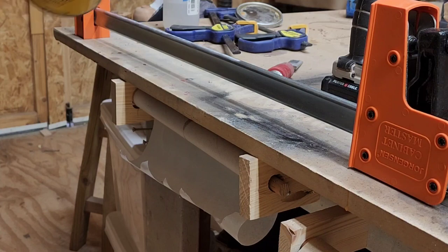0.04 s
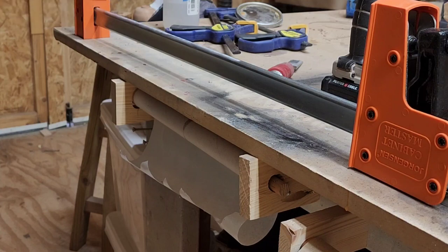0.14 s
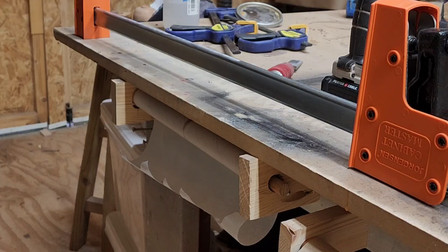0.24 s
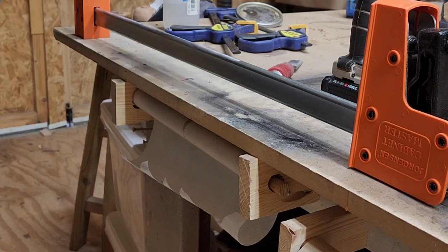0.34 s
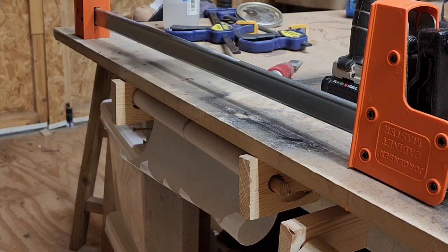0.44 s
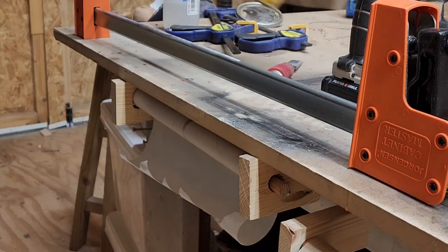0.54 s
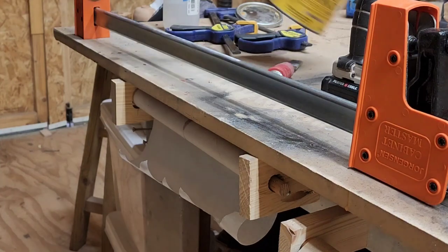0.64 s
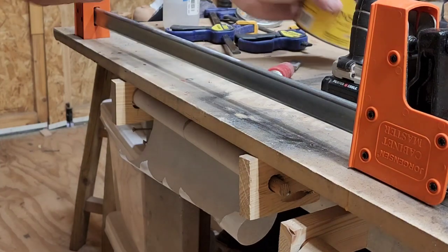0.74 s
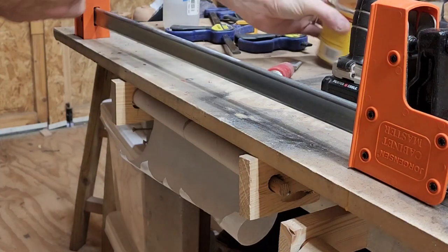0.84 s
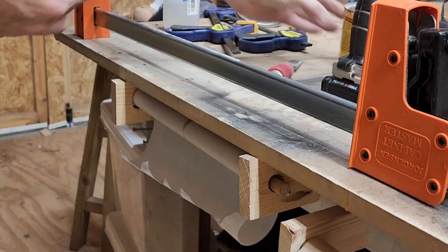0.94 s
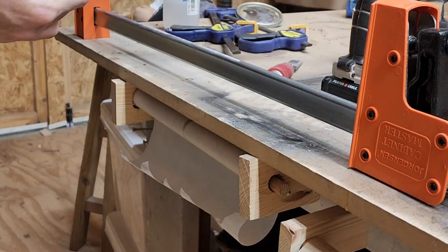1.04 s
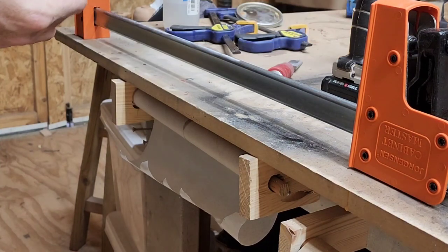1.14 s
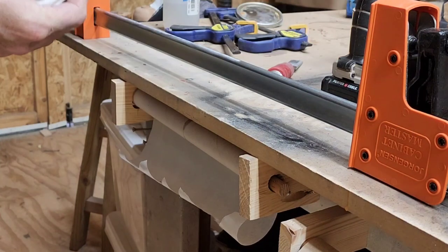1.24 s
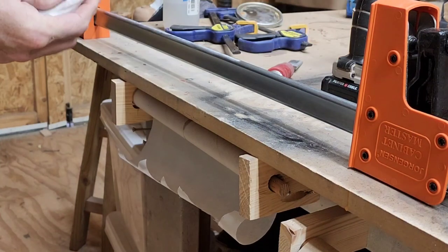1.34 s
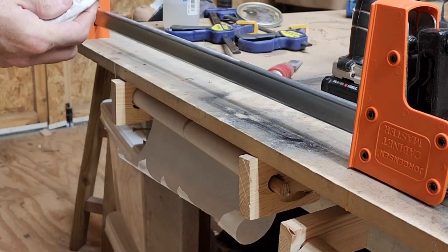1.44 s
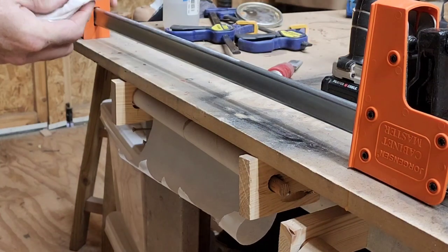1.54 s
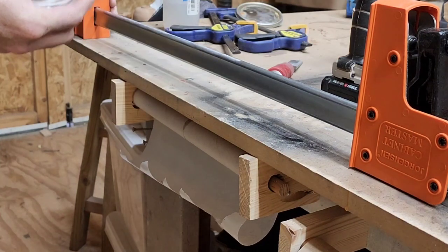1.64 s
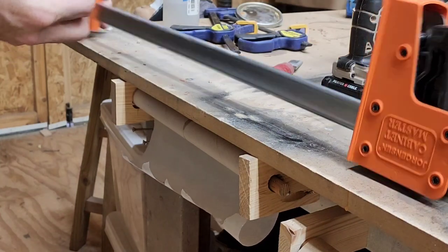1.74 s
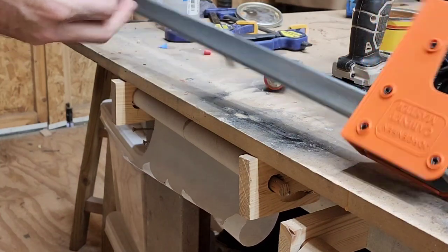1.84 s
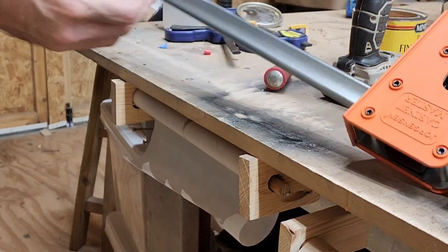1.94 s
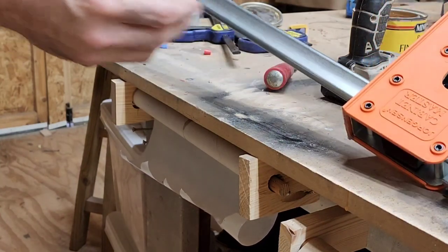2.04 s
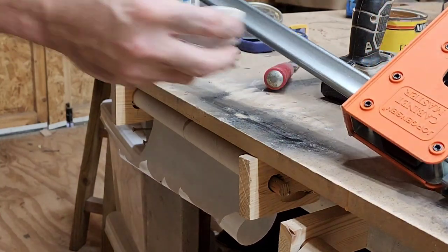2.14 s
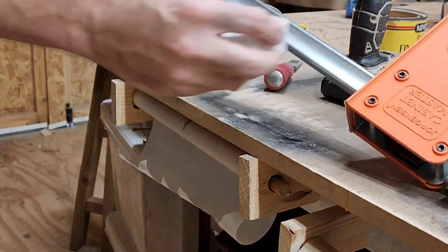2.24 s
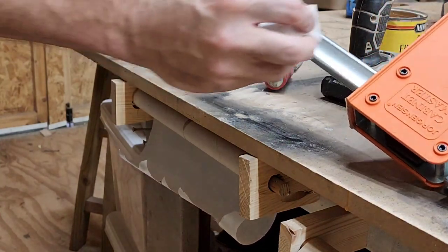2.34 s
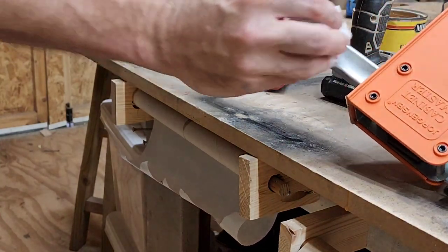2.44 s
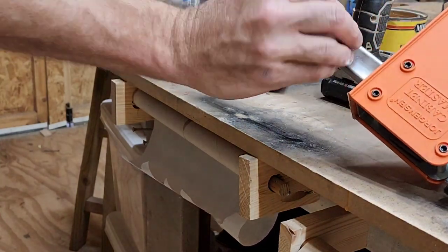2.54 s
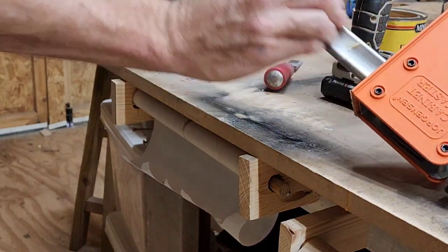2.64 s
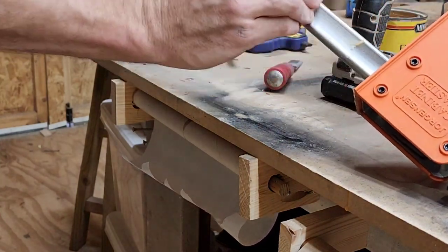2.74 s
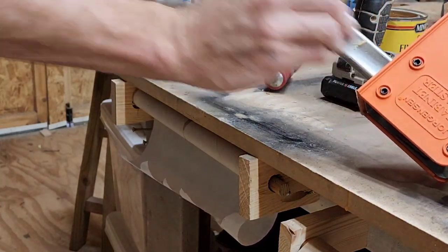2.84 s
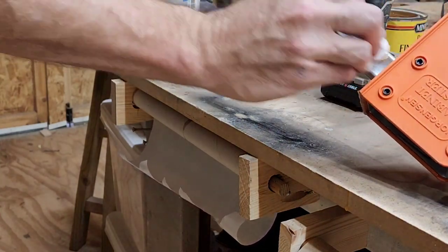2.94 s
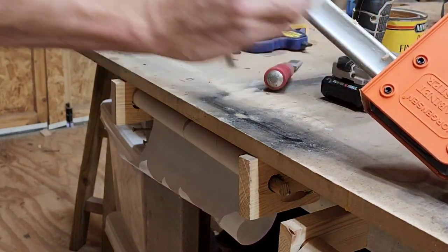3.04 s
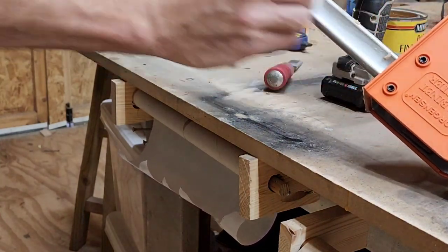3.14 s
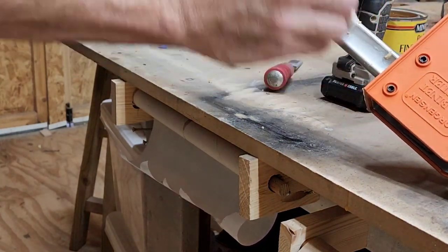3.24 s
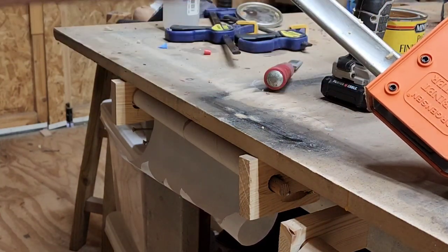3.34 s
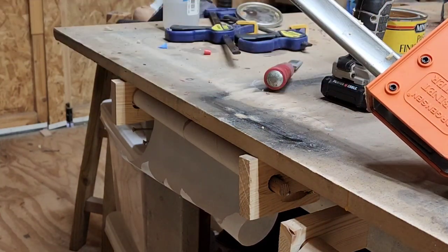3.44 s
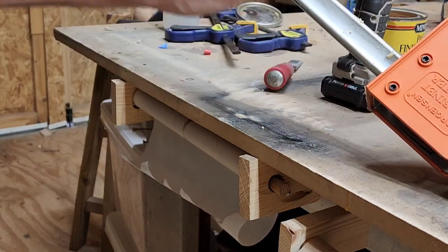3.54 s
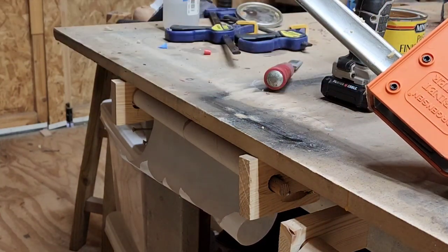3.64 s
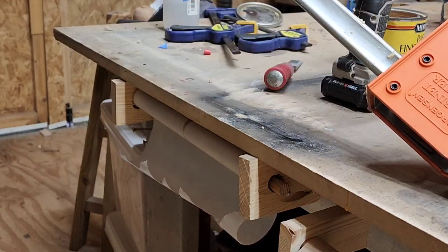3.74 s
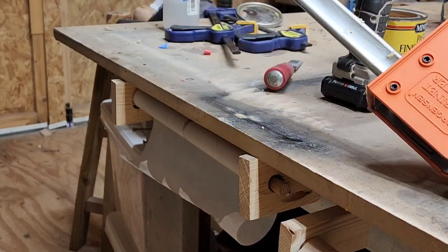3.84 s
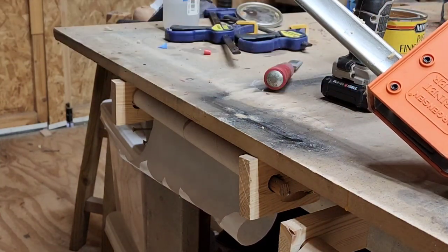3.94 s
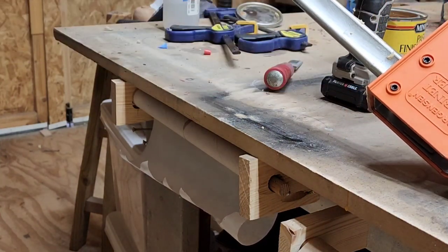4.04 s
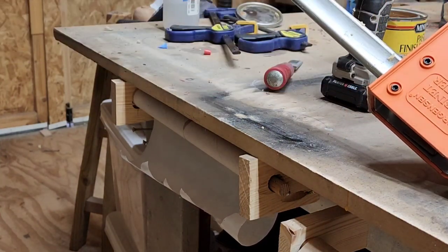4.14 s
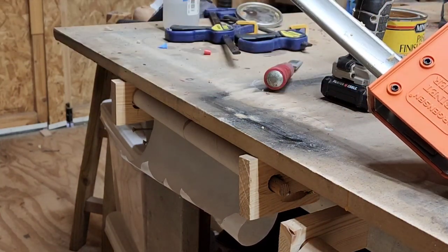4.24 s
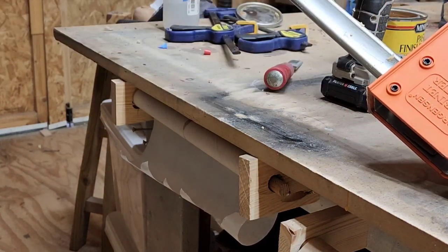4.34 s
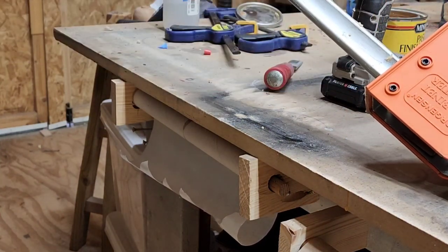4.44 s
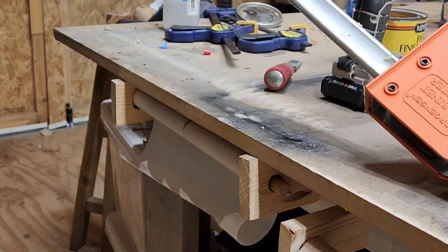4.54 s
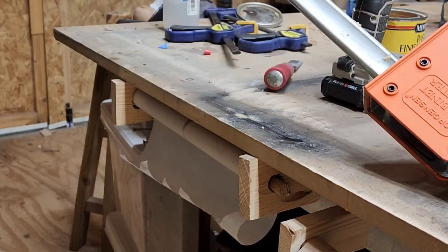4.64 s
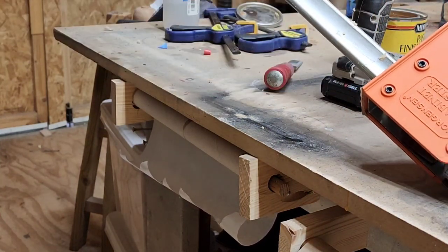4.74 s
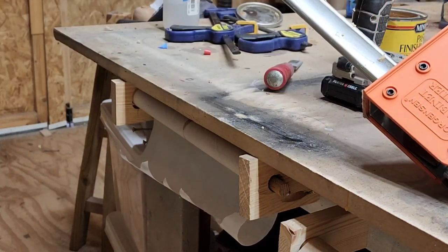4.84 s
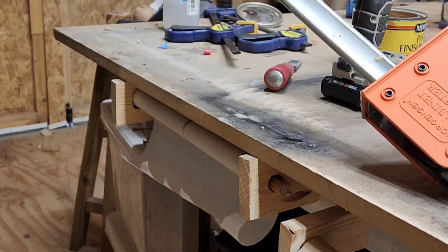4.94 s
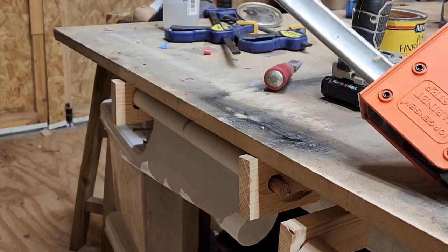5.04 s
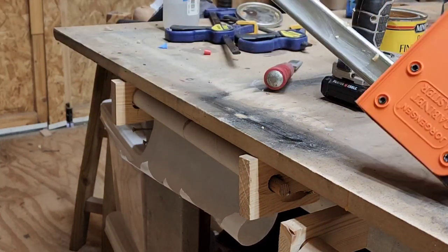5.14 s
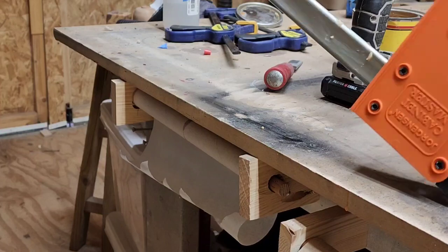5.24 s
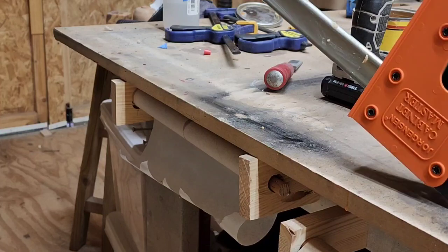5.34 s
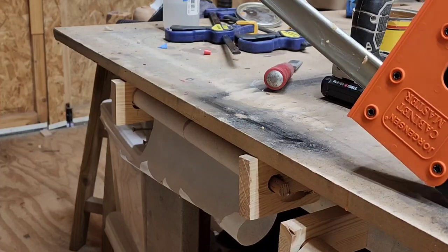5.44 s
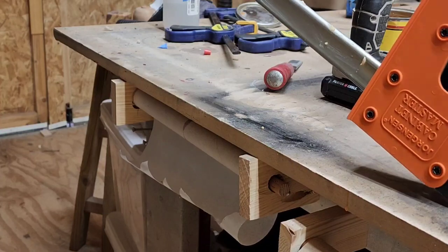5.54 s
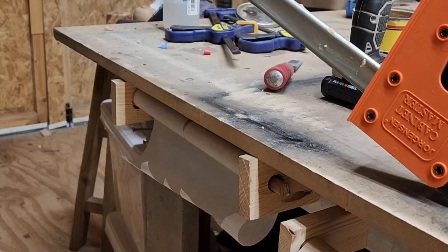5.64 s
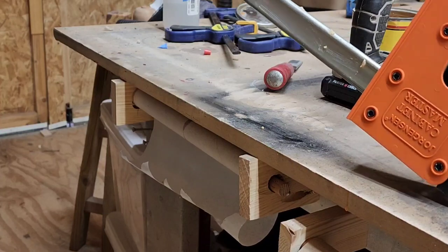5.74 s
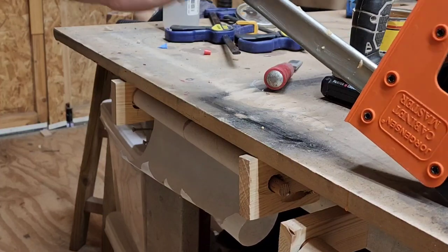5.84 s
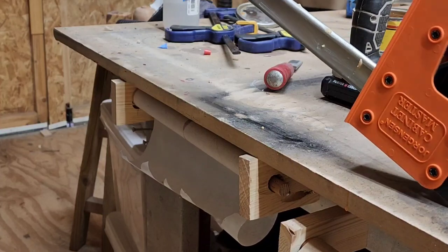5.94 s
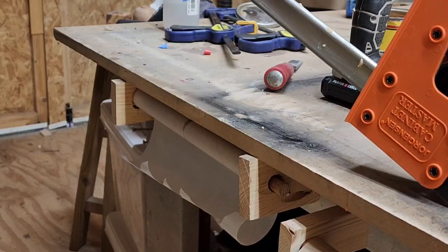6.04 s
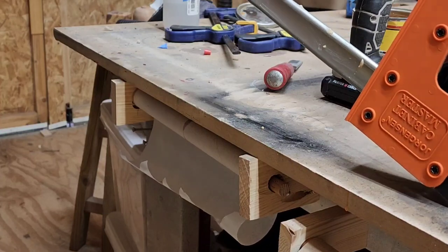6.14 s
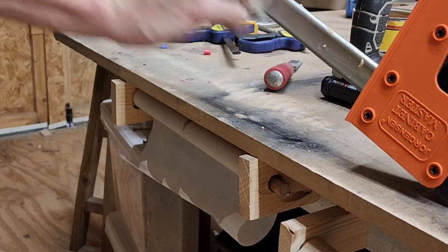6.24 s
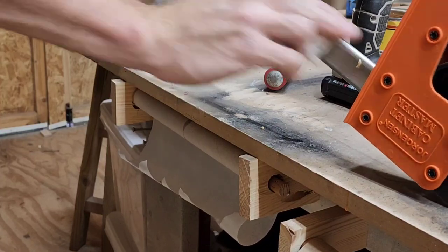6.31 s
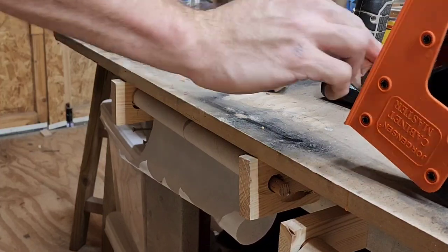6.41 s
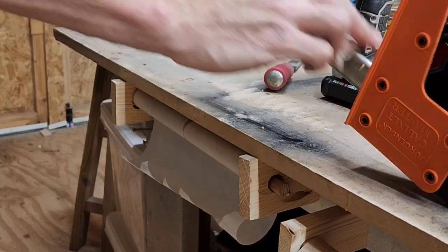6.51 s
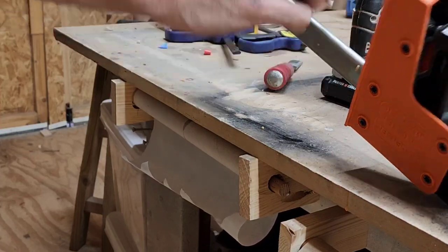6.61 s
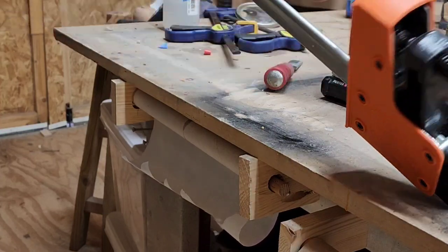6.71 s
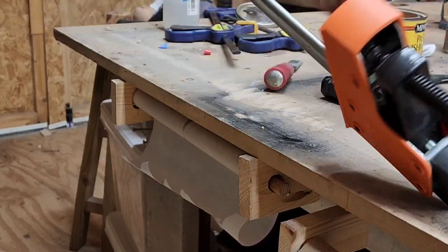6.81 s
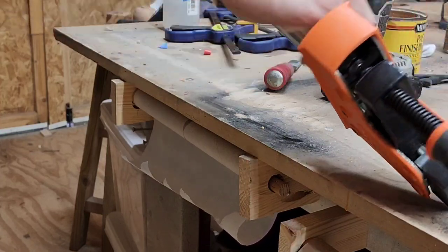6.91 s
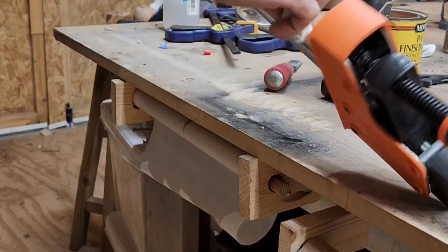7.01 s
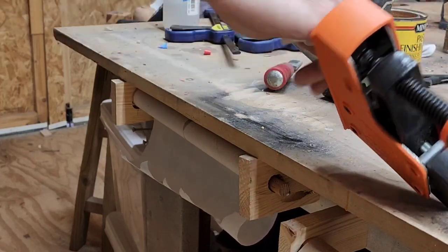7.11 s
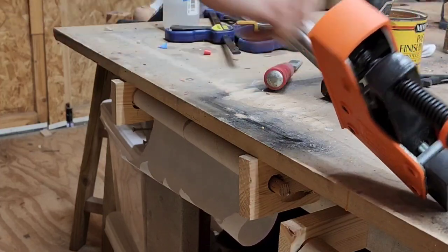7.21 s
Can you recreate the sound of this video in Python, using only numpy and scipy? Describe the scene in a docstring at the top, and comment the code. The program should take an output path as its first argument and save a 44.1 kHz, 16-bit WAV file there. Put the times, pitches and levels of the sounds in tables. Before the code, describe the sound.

In a small workshop with a fan humming, a tin and its lid knock sharply on a wooden workbench, shaking the tools. A steel bar clamp with plastic jaws is rolled over and lands with a clatter and a low boom. A rag then hisses softly back and forth along the bar while the loose jaw clacks, ending with a brief metallic snap. The clamp is close to the microphone, slightly to the right.

```python
"""A small workshop, a fan humming. A wax tin, then its lid, knock on a wooden workbench, ringing the
boards and shaking the tools. A steel bar clamp with plastic jaws is rolled over and drops on the
booming bench top. A rag hisses to and fro along its bar; the loose jaw rocks, clacks and skids, and the
screw snaps against the steel. The two microphone ports are a hand's length apart."""
import sys
import numpy as np
from scipy import signal
from scipy.fft import rfft, irfft, next_fast_len
from scipy.io import wavfile
from scipy.ndimage import uniform_filter1d, minimum_filter1d

SR = 44100
rng = np.random.default_rng(int(sys.argv[2]) if len(sys.argv) > 2 else 0)


def wrap_up_sound(samples):
    """Save the sound to the file named by the first command line argument, as 16-bit audio."""
    columns = np.atleast_2d(samples).T
    # keep every value between -1 and 1, then stretch to whole-number steps
    tamed = np.clip(columns, -1, 1)
    steps = np.round(tamed * 32767).astype(np.int16)
    wavfile.write(sys.argv[1], SR, steps)


N = 320607
TIME = np.arange(N) / SR
PORT_SPACING_S = 0.00054


def from_db(db):
    """Decibels to gain."""
    return 10 ** (np.asarray(db) / 20)


def rms_one(x):
    """Scale to rms 1."""
    return x / np.sqrt(np.mean(x ** 2) + 1e-20)


def at_hz(points, hz):
    """Read a table on a log-frequency axis."""
    known_hz, values = np.transpose(points)
    return np.interp(np.log(np.maximum(hz, 1)), np.log(known_hz), values)


def fade(t, t60_s):
    """Free decay, 60 dB per t60_s."""
    return np.exp(-np.log(1000) * t / t60_s)


def swell(t, rise_s):
    """Build-up of a contact."""
    return 1 - np.exp(-(t / rise_s) ** 2)


def add(out, at_s, sound):
    """Mix a sound in at at_s."""
    start = int(round(at_s * SR))
    out[..., start:start + sound.shape[-1]] += sound[..., :N - start]


def from_right(x, lag_samples):
    """Sound from the right reaches the left port later."""
    return np.stack([np.pad(x[0], (lag_samples, 0))[:x.shape[1]], x[1]])


def noise(gain_at, size, direct=0):
    """Stereo noise, rms 1; the share not direct is diffuse, alike at both ports only in the bass."""
    padded = next_fast_len(size)
    hz = np.arange(padded // 2 + 1) * SR / padded
    mid, side = rfft(rng.standard_normal((2, padded)))
    coherence = direct + (1 - direct) * 0.95 * np.sinc(2 * hz * PORT_SPACING_S)
    ports = np.sqrt(1 + coherence) * mid + np.sqrt(1 - coherence) * side * [[1], [-1]]
    return rms_one(irfft(ports * gain_at(hz), padded)[:, :size])


def coloured(spectrum, size, direct=0):
    """Stereo noise, rms 1, shaped by a spectrum table."""
    return noise(lambda hz: from_db(at_hz(spectrum, hz)), size, direct)


def grain(span_samples):
    """Random unevenness of a rubbing contact, rms 1."""
    return rms_one(uniform_filter1d(rng.standard_normal(N), size=span_samples))


def damped(modes, t60_at_1khz_s):
    """Give each mode a ring time that shortens with the root of its frequency."""
    return [(hz, db, t60_at_1khz_s * np.sqrt(1000 / hz)) for hz, db in modes]


def struck(modes, spread_db, rise_s, pitch=1):
    """One blow: modes start in alternate directions; the contact point varies the strength of each."""
    hz, db, t60_s = np.transpose(modes)[:, :, None]
    t = TIME[:int(t60_s.max() * SR)]
    gains = from_db(db + spread_db * rng.standard_normal((len(modes), 1)))
    rings = gains * np.sin(2 * np.pi * hz * pitch * t) * fade(t, t60_s)
    return (rings[::2].sum(axis=0) - rings[1::2].sum(axis=0)) * swell(t, rise_s)


# fan airflow: f/Hz, relative density/dB
AIR_SPECTRUM = [(22, -51.5), (42, 11), (60, -1.5), (120, 7), (200, -9.5), (500, -13.5), (900, -9),
                (1600, -11.5), (3000, -18), (5000, -24.5), (7200, -35.5), (8600, -66.5), (12000, -39.5),
                (16000, -47)]
# fan and room resonances: f/Hz, width/Hz, level/dB
HUM_PEAKS = [(56.4, 6.4, -54.5), (102, 6.5, -51), (172, 10, -58), (235, 7.1, -59.5), (404.4, 84, -56.5),
             (990, 15, -63)]
def fan(air_db=-49.5, mains_hz=120.3, mains_db=-48):
    """Moving air, a steady mains tone and wavering resonances; part comes straight from the right."""
    def resonances(hz):
        return np.sqrt(sum(from_db(2 * db) / width_hz / (1 + ((hz - centre_hz) / width_hz) ** 2) ** 2
                           for centre_hz, width_hz, db in HUM_PEAKS))
    hum = np.linalg.norm([from_db(db) for _, _, db in HUM_PEAKS]) * noise(resonances, N)
    mains = from_db(mains_db) * rms_one(np.sin(2 * np.pi * mains_hz * TIME))
    diffuse_air = coloured(AIR_SPECTRUM, N)
    direct_air = from_db(-4) * from_right(coloured(AIR_SPECTRUM, N, direct=0.94), lag_samples=15)
    return from_db(air_db) * (diffuse_air + direct_air) + from_right(hum + mains, lag_samples=8)


# tin rim on wood: f/Hz, relative density/dB
SCUFF_SPECTRUM = [(300, -21), (1300, 4), (2050, -2), (3000, -28), (8000, -41.5)]
def tin_scuff(end_db=-23.5, rise_db_per_s=899):
    """The rim scrapes the wood, swelling into the tin's first knock."""
    landing_s = SET_DOWNS[0][0]
    ahead_s = landing_s - TIME[TIME < landing_s]
    scrape = from_db(end_db - rise_db_per_s * ahead_s) * coloured(SCUFF_SPECTRUM, len(ahead_s))
    return np.pad(scrape, [(0, 0), (0, N - len(ahead_s))])


# tin, then lid: t/s, level/dB, clatter level/dB, low-pass f/Hz, loss per bounce/dB
SET_DOWNS = [(1.0057, 1.5, -15, 9000, 3.5), (1.1917, -4, -23, 8000, 26)]
# hollow tin: f/Hz, level/dB
TIN_MODES = [(773, -19.5), (927, -28), (1030, -22.5), (1122, -25), (1446, -24), (1502, -18), (1717, -22),
             (2410, -27)]
# lid: f/Hz, level/dB
LID_MODES = [(678, -12.5), (1120, -16), (1385, -13), (1610, -9), (2060, -10)]
# bench boards: f/Hz, level/dB
BOARD_MODES = [(222, -24), (300, -27), (382, -25), (446, -24.5), (680, -20.5), (711, -16.5), (835, -24)]
# shaken bench and tools: f/Hz, relative density/dB
CLATTER_SPECTRUM = [(50, -8.5), (130, 3.5), (350, -5.5), (700, -0.5), (1500, 1), (2200, -11.5),
                    (2600, -17.5), (3500, -16), (4500, -27), (7000, -40.5), (9000, -59), (13000, -33)]
def knocks(contact_s=0.00017, clatter_t60_s=0.26, bounce_gap_s=0.025, soft_hz=1800):
    """Tin and lid land: blunt pulses, tool clatter, ring of boards and body; soft contacts are duller."""
    out, t = np.zeros((2, N)), TIME[:SR // 2]
    u = t / contact_s - 2 * np.pi
    pulse = (u ** 2 - 1) * np.exp(-u ** 2 / 2)   # pressure from a bell-shaped push
    clatter_envelope = fade(t, clatter_t60_s) * swell(t, rise_s=0.0011)
    boards = damped(BOARD_MODES, t60_at_1khz_s=0.11)
    bodies = damped(TIN_MODES, t60_at_1khz_s=0.1), damped(LID_MODES, t60_at_1khz_s=0.075)
    for (at_s, db, clatter_db, hard_hz, loss_db), body in zip(SET_DOWNS, bodies):
        # near edge, flat, far edge; then two bounces that mostly shake the tools
        landing = [(-0.00296, -9, db, soft_hz), (0, 0, db, hard_hz), (0.0051, -10.5, db, hard_hz)]
        bounces = [(k * bounce_gap_s, -3.5 - k * loss_db, db - 13, soft_hz) for k in (1, 2)]
        for after_s, touch_db, push_db, top_hz in landing + bounces:
            clatter = from_db(clatter_db) * coloured(CLATTER_SPECTRUM, len(t), direct=0.16)
            blow = clatter * clatter_envelope + from_db(push_db) * pulse
            low_pass = signal.butter(2, top_hz, fs=SR, output="sos")
            add(out, at_s + after_s, from_db(touch_db) * signal.sosfilt(low_pass, blow))
        add(out, at_s, from_db(db) * struck(boards, spread_db=2.5, rise_s=0.002))
        add(out, at_s, from_db(db) * struck(body, spread_db=2.5, rise_s=0.0018))
    return out


# weight landing on the bench: t/s, level/dB
BENCH_LOADS = [(1.01, -22), (1.204, -23.5), (2.007, -14), (2.017, -23.5), (2.0465, -11), (6.824, -31),
               (6.869, -29)]
# bending of the whole top: f/Hz, level/dB, t60/s
BENCH_MODES = [(101.5, -4, 0.39), (146, -16, 0.26), (217.8, -11, 0.3), (274.3, -26, 0.36),
               (385.4, -18.5, 0.23)]
def bench_thumps(shift_lag_s=0.025, shift_db=-18.5):
    """The top booms under each load, and faintly as the clamp's weight shifts after each jaw rock."""
    out = np.zeros((2, N))
    shifts = [(at_s + shift_lag_s, db + shift_db) for at_s, db, _, _ in JAW_ROCKS]
    for at_s, db in list(BENCH_LOADS) + shifts:
        add(out, at_s, from_db(db) * struck(BENCH_MODES, spread_db=0.5, rise_s=0.00085))
    return out


# tin on its base: t/s, level/dB, pitch ratio
TIN_WOBBLES = [(1.134, 6, 1), (1.149, 0, .6)]
def tin_wobble():
    """A hollow double bump, the second lower: only the tin's lowest modes sound, damped by the hand."""
    out = np.zeros((2, N))
    low_modes = damped(TIN_MODES[:2], t60_at_1khz_s=0.04)
    for at_s, db, pitch in TIN_WOBBLES:
        add(out, at_s, from_db(db) * struck(low_modes, spread_db=0.5, rise_s=0.004, pitch=pitch))
    return out


# plastic jaw, main mode first: f/Hz, level/dB, t60/s
JAW_MODES = [(1384, 1, 0.013), (1233, -4.5, 0.0093), (690, -7, 0.0052), (1548, -4, 0.011),
             (2195, -11, 0.013), (4290, -23, 0.023)]
# plastic crack: f/Hz, relative density/dB
CRACK_SPECTRUM = [(300, -7), (1400, -3.5), (2300, 4), (3300, 3), (4200, 0), (5200, -7), (7200, -16.5),
                  (8800, -73), (16000, -26)]
# steel tick: f/Hz, relative density/dB
TICK_SPECTRUM = [(3000, -16), (7000, -11.5), (8800, -17.5), (10500, -11), (12000, -4.5), (14000, -6),
                 (16000, -18)]
def clack(db, hardness, ring_hz):
    """The hollow jaw rings, pitched by where it is hit; hard contacts add plastic crack and steel tick."""
    t = TIME[:SR // 16]
    crack_db = -15 + 22.5 * hardness   # hardness 0: plastic on wood, 1: steel on steel
    tick_db = -34 + 42 * hardness
    crack = from_db(crack_db) * coloured(CRACK_SPECTRUM, len(t), direct=0.47) * fade(t, t60_s=0.019)
    tick = from_db(tick_db) * coloured(TICK_SPECTRUM, len(t), direct=0.078) * fade(t, t60_s=0.024)
    sound = (crack + tick) * swell(t, rise_s=0.00085)
    pitch = ring_hz / JAW_MODES[0][0] * rng.normal(1, 0.015)
    add(sound, 0, struck(JAW_MODES, spread_db=1.5, rise_s=0.0012, pitch=pitch))
    return from_db(db) * sound


def chatter(db, hardness, ring_hz, gap_s=0.0036, loss_db=6, spread_db=1.5):
    """Loose parts strike, then bounce twice, unevenly and dying away."""
    out, at_s = np.zeros((2, SR // 8)), 0
    add(out, at_s, clack(db, hardness, ring_hz))
    for k in (1, 2):
        at_s += gap_s * 2 ** rng.uniform(-0.5, 0.5)
        bounce_db = db - k * loss_db + spread_db * rng.standard_normal()
        add(out, at_s, clack(bounce_db, hardness, ring_hz))
    return out


# loose jaw rocking on the bar: t/s, level/dB, hardness 0-1, ring f/Hz
JAW_ROCKS = [(1.8281, -13.5, 0.25, 1290), (1.833, -22.5, 0.16, 1380), (1.847, -23.5, 0.24, 1380),
             (4.261, -28.5, 0, 1360), (5.0777, -18.5, 0.11, 1400), (5.0922, -18, 0.05, 1350),
             (5.458, -24, .05, 1360), (5.483, -25, 0, 1350), (5.4902, -19.5, 0.1, 1390),
             (5.567, -11.5, 0.05, 1350), (5.585, -21.5, 0.17, 1370), (5.7406, -21, 0, 1370),
             (5.888, -18, 0.26, 1330), (6.024, -34.5, 0.33, 1390), (6.0464, -23.5, 0, 1350),
             (6.063, -23.5, 0.1, 1380), (6.2808, -22, 0.26, 1386), (6.556, -15.5, 0.16, 1340),
             (6.8332, -22.5, 0.1, 1480)]
# clamp falling over: t/s, level/dB, hardness 0-1
CLAMP_LANDINGS = [(1.982, -18.5, .45), (1.9918, -9.5, 0.48), (2.0005, -16, 0.53), (2.0107, -5.5, 0.3),
                  (2.0152, -13.5, 0.6), (2.024, -12, 0.5), (2.0371, -14, 0.66), (2.0435, -3.5, 0.38),
                  (2.047, -13, 0.56), (2.0616, -12, 0.52), (2.086, -38, .85)]
def clamp_clacks(slip_lead_s=0.0038, slip_db=-16):
    """The clamp tumbles to rest; at each rock its jaw slips a little, then strikes."""
    out = np.zeros((2, N))
    for at_s, db, hardness in CLAMP_LANDINGS:
        add(out, at_s, chatter(db, hardness, ring_hz=JAW_MODES[0][0]))
    for at_s, db, hardness, ring_hz in JAW_ROCKS:
        add(out, at_s - slip_lead_s, clack(db + slip_db, hardness, ring_hz))
        add(out, at_s, chatter(db, hardness, ring_hz))
    return out


# jaw sliding on wood: start t/s, end t/s, level/dB
JAW_SKIDS = [(1.928, 1.988, -45.5), (1.981, 2.069, -30), (5.063, 5.098, -41.5), (5.18, 5.221, -45),
             (5.875, 5.891, -36.5), (6.824, 6.851, -40), (7.237, 7.284, -47.5)]
def jaw_skids(grain_db=6):
    """Plastic sticks and slips on the wood in short rasps."""
    envelope = np.zeros(N)
    for start_s, end_s, db in JAW_SKIDS:
        progress = np.clip((TIME - start_s) / (end_s - start_s), 0, 1)
        envelope += from_db(db) * np.sqrt(np.sin(np.pi * progress))
    roughness = from_db(grain_db * grain(span_samples=60))
    return envelope * rms_one(roughness * coloured(CRACK_SPECTRUM, N, direct=0.37))


# strokes, each lasting to the next, muted after stop_s: turn t/s, level/dB
HAND_STROKES = [(2.76, -56.5), (2.92, -55.5), (3.1, -48.5), (3.27, -60), (3.405, -47), (3.585, -50),
                (3.7, -49), (3.875, -48), (3.994, -53.5), (4.19, -52.5), (4.345, -51), (4.52, -57.5),
                (4.655, -56.5), (4.8, -56), (4.945, -54.5), (5.09, -53), (5.361, -53.5), (5.51, -53),
                (5.65, -46.5), (6.05, -49.5), (6.26, -52.5), (6.6, -67), (6.75, -73), (6.98, -46),
                (7.189, -43)]
def rag_strokes(stop_s=6.7, speed_power=0.95, wander_db=1.2):
    """Rubbing strength: the hand speeds up, presses unevenly and stops at each turn."""
    turns_s, db = np.transpose(HAND_STROKES)
    stroke = np.interp(TIME, turns_s, np.arange(len(turns_s)))
    wander = from_db(wander_db * grain(span_samples=SR // 20))
    pressure = from_db(db)[stroke.astype(int)] * wander * (TIME <= stop_s)
    speed = np.abs(np.sin(np.pi * stroke))
    return uniform_filter1d(pressure * speed ** speed_power, size=SR // 100)   # soft cloth eases in, out


# rag on steel: f/Hz, relative density/dB
RAG_SPECTRUM = [(1500, 1.5), (3000, -4), (5000, -2), (7400, -2), (8700, -16.5), (10500, -3.5), (12500, 4),
                (16000, -2)]
# hiss above fine_hz, stronger as the rag nears the jaw: t/s, level/dB
RAG_TREBLE = [(3.0, -10), (3.8, -2), (4.8, -7), (5.7, -8), (6.2, -3.5), (7.2, 0)]
def rag(fine_hz=9000, rustle_db=-74, grain_db=1.8):
    """Friction hiss follows the strokes over a faint rustle in the hand; catching fibres add grain."""
    hiss = coloured(RAG_SPECTRUM, N, direct=0.046)
    fine = signal.sosfiltfilt(signal.butter(2, fine_hz, "high", fs=SR, output="sos"), hiss)
    fine_gain = from_db(np.interp(TIME, *np.transpose(RAG_TREBLE)))
    hiss = hiss + (fine_gain - 1) * fine
    strength = rag_strokes() + from_db(rustle_db)
    return strength * from_db(grain_db * grain(span_samples=200)) * hiss


# screw hitting the bar: t/s, clack level/dB, hardness 0-1, steel ring level/dB
SCREW_SNAPS = [(5.185, -31, 0.71, -46), (5.22, -17, 0.52, -51), (6.9593, -26, 0.77, -22),
               (7.049, -40, 0.77, -35)]
def screw_snaps():
    """The screw snaps against the bar, one hard clack each time."""
    out = np.zeros((2, N))
    for at_s, db, hardness, _ in SCREW_SNAPS:
        add(out, at_s, clack(db, hardness, ring_hz=JAW_MODES[0][0]))
    return out


# bar and screw: f/Hz, level/dB, t60/s
STEEL_MODES = [(2990, 7.5, 0.0087), (4290, 4.5, 0.0092), (11800, -29, 0.022)]
def steel_pings():
    """Each snap of the screw rings the steel briefly."""
    out = np.zeros((2, N))
    for at_s, _, _, ring_db in SCREW_SNAPS:
        add(out, at_s, from_db(ring_db) * struck(STEEL_MODES, spread_db=1, rise_s=0.0005))
    return out


# room decay: f/Hz, t60/s
ROOM_DECAY = [(100, 0.45), (500, 0.27), (2000, 0.18), (6000, 0.21), (16000, 0.033)]
def workshop_echoes(x, first_echo_s=0.00088):
    """Diffuse echoes from bench, walls and clutter; the treble dies first."""
    t, echoes = TIME[:SR // 2], 0
    for band_hz, t60_s in ROOM_DECAY:
        band = [(hz, float(hz == band_hz)) for hz, _ in ROOM_DECAY]
        power_share = at_hz(band, np.linspace(0, SR / 2, len(t))).mean()
        band_noise = noise(lambda hz: np.sqrt(at_hz(band, hz)), len(t))
        echoes = echoes + np.sqrt(power_share) * band_noise * fade(t, t60_s)
    echoes = echoes * (t > first_echo_s)
    return signal.fftconvolve(x.mean(axis=0)[None], echoes / np.linalg.norm(echoes[0]), axes=1)[:, :N]


def scene():
    """The clamp lies close, a little to the right; the tin is further back, with more room sound."""
    tin = knocks() + tin_wobble() + tin_scuff()
    clamp = clamp_clacks() + screw_snaps() + jaw_skids()
    bench = bench_thumps() * from_db([[-1.2], [0.8]])
    rubbing = rag()
    room = workshop_echoes(from_db(-8.5) * tin + from_db(-10) * clamp)
    return from_right(tin + clamp + steel_pings() + bench, lag_samples=3) + room + rubbing + fan()


def limiter(x, ceiling, span_samples):
    """The gain ducks smoothly around any peak above the ceiling."""
    needed = np.minimum(1, ceiling / (np.abs(x).max(axis=0) + 1e-9))
    held = minimum_filter1d(needed, 2 * span_samples)
    return x * uniform_filter1d(uniform_filter1d(held, span_samples), span_samples)


# port imbalance: f/Hz, left minus right level/dB
PORT_IMBALANCE = [(100, 0), (600, 1.3), (1400, 1.5), (2500, 1.5), (4400, 2), (8000, 17.5), (10500, 2),
                  (15000, -1)]
def record(dry):
    """Each port colours the sound differently; then rumble cut, peak limiter and steep treble cut."""
    rumble_hz, cutoff_hz = 28, 16000
    hz = np.arange(N + 1) * SR / (2 * N)
    port_gains = from_db(at_hz(PORT_IMBALANCE, hz) * [[0.5], [-0.5]])
    ports = irfft(rfft(dry, 2 * N) * port_gains)[:, :N]
    ports = signal.sosfilt(signal.butter(3, rumble_hz, "high", fs=SR, output="sos"), ports)
    limited = limiter(ports, ceiling=0.97, span_samples=40)
    return signal.sosfilt(signal.ellip(10, 0.1, 80, cutoff_hz, fs=SR, output="sos"), limited)


dry = scene()
out = record(dry)
wrap_up_sound(out)
```